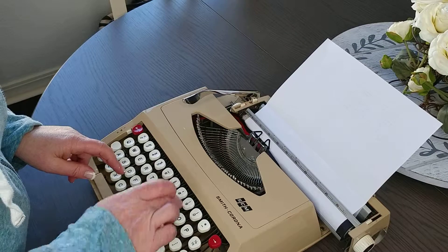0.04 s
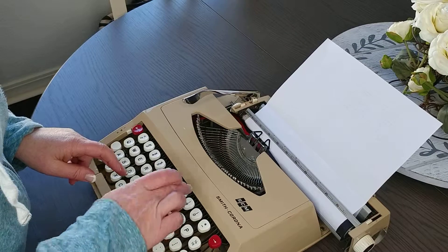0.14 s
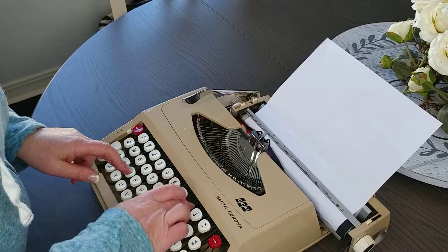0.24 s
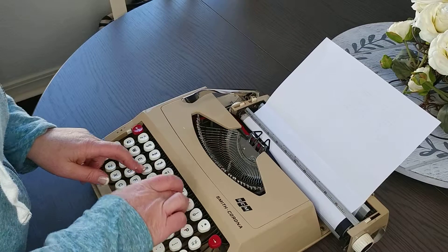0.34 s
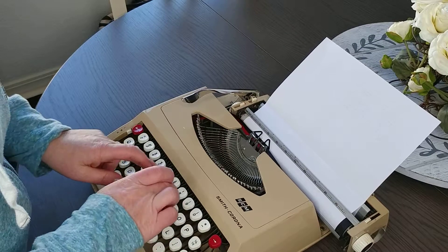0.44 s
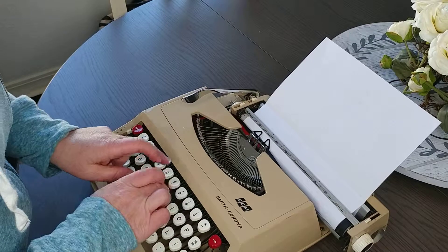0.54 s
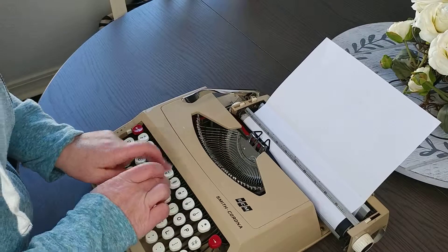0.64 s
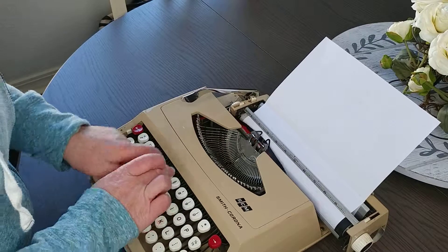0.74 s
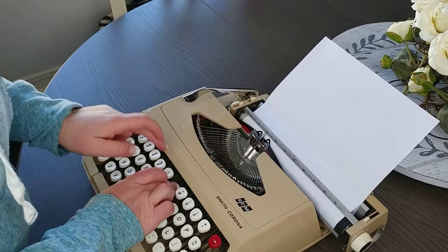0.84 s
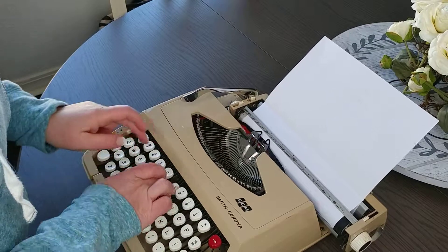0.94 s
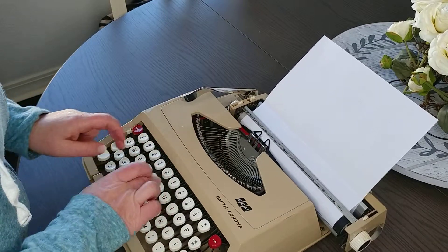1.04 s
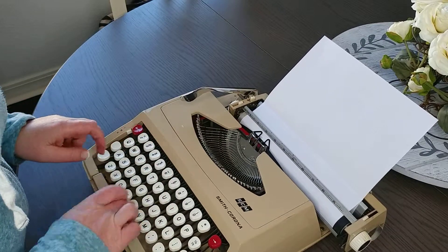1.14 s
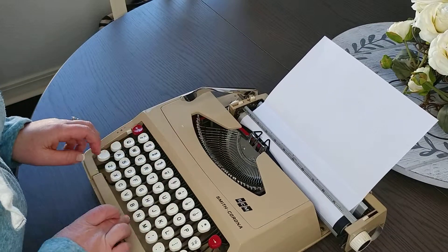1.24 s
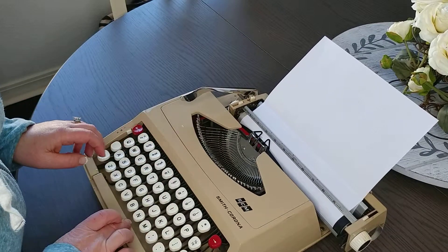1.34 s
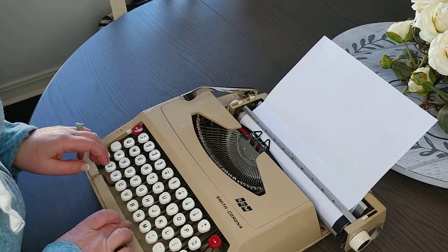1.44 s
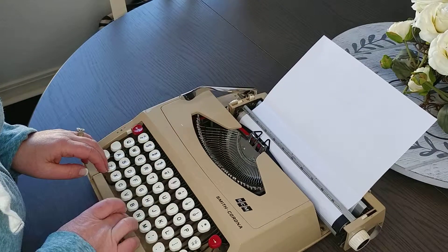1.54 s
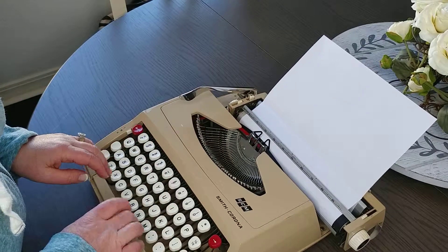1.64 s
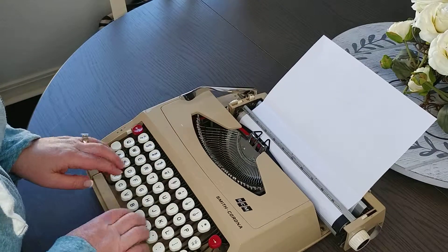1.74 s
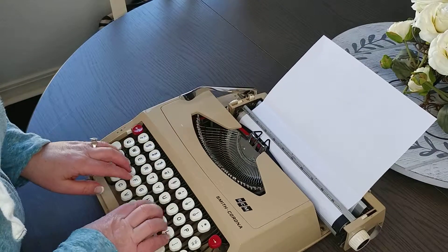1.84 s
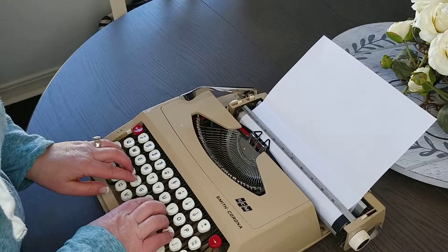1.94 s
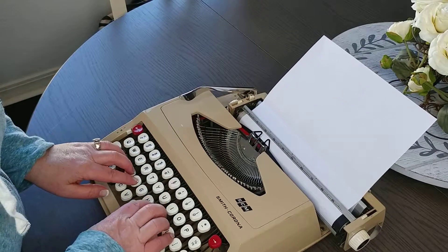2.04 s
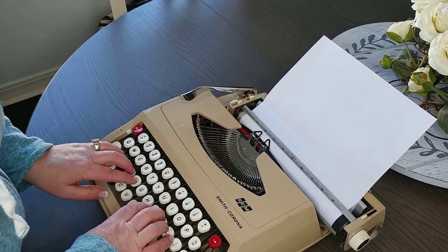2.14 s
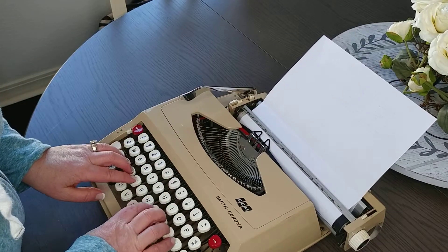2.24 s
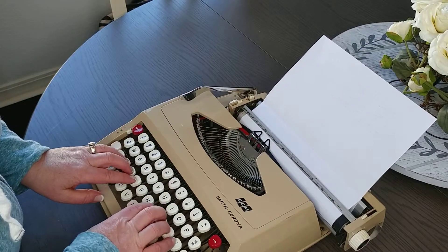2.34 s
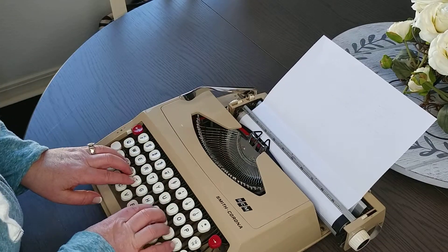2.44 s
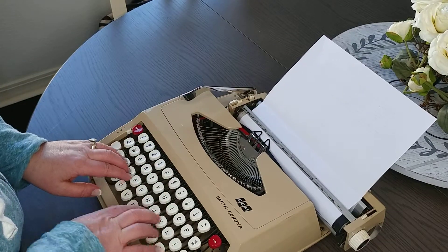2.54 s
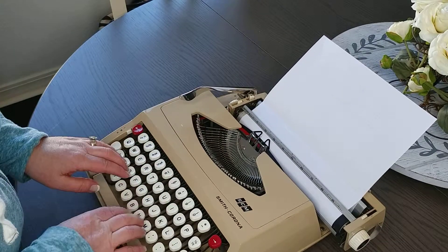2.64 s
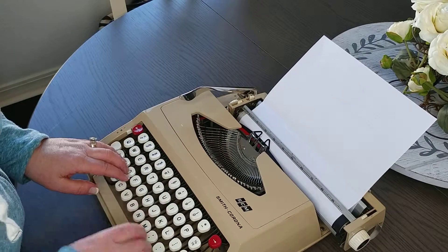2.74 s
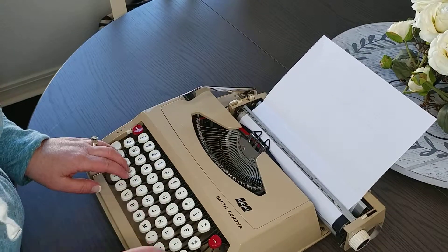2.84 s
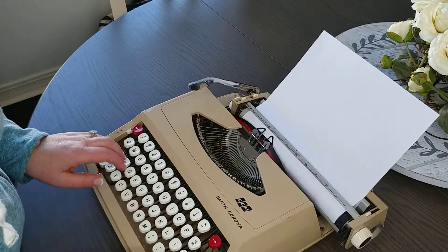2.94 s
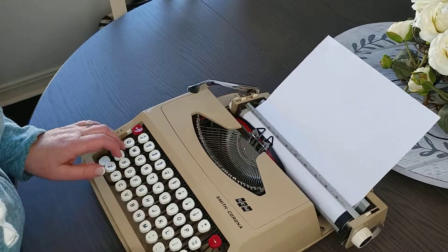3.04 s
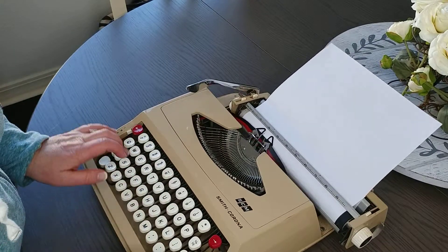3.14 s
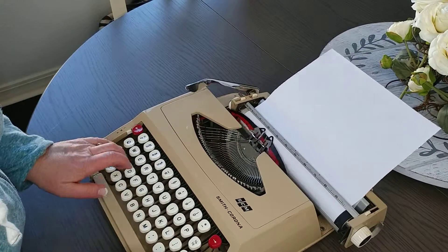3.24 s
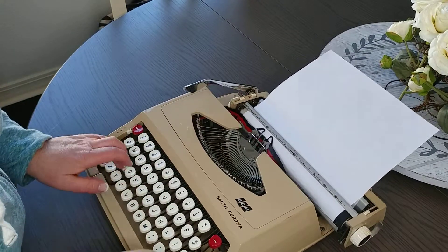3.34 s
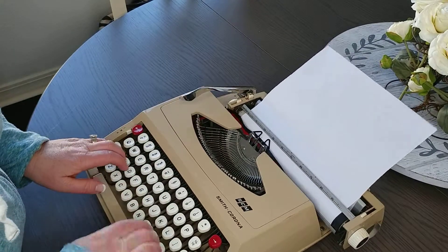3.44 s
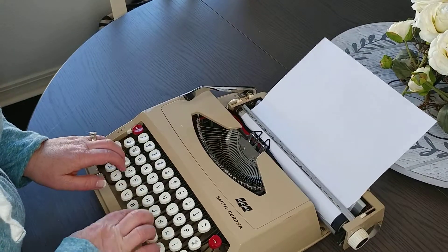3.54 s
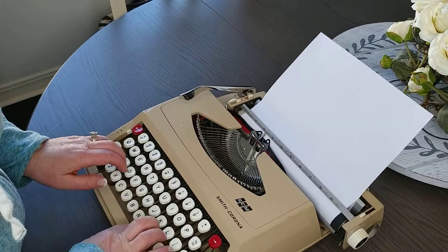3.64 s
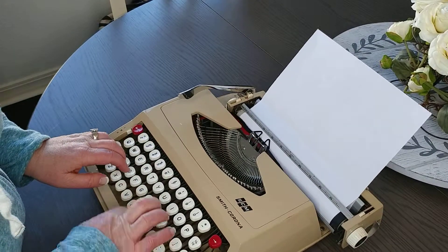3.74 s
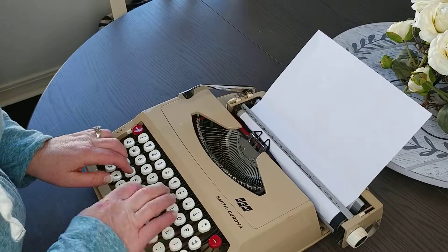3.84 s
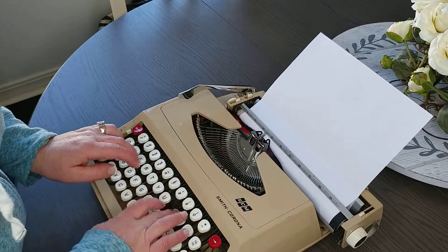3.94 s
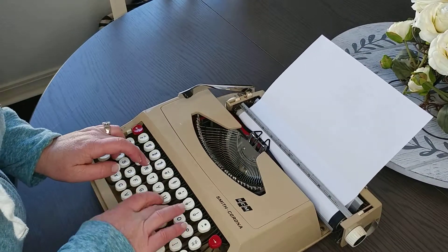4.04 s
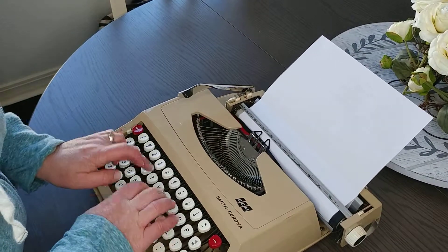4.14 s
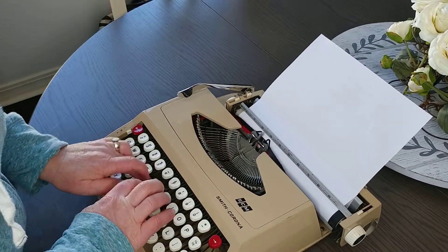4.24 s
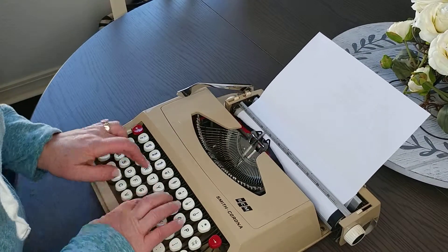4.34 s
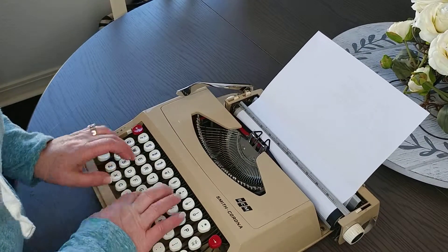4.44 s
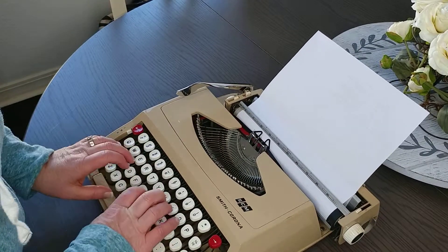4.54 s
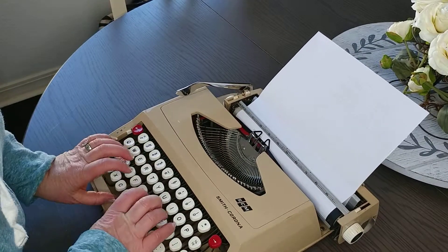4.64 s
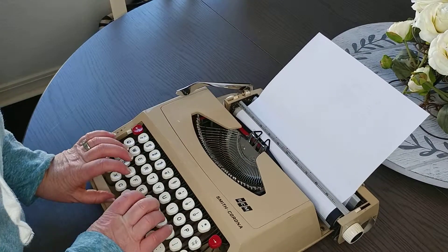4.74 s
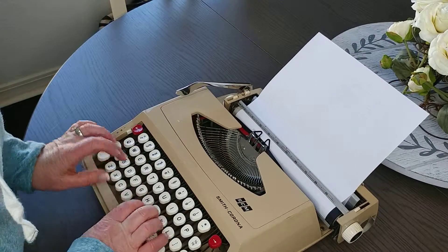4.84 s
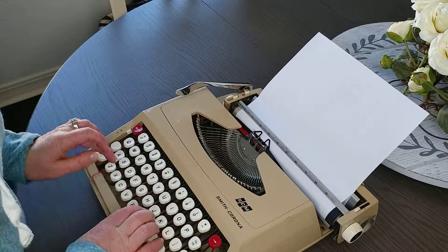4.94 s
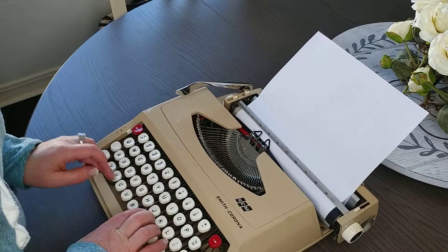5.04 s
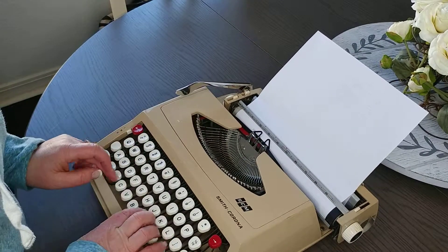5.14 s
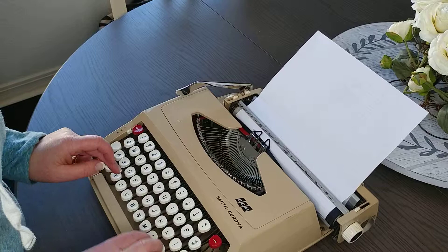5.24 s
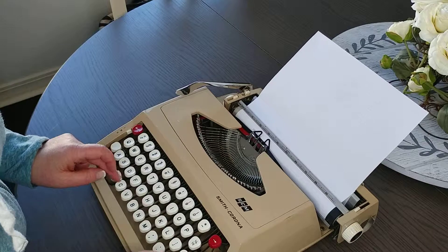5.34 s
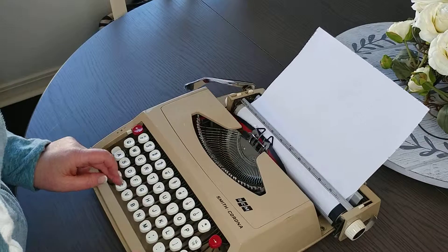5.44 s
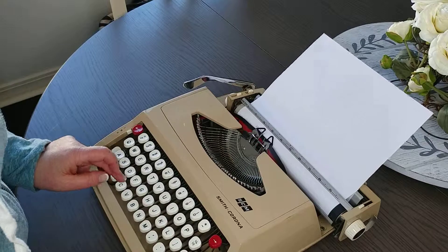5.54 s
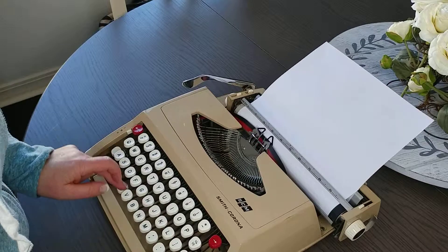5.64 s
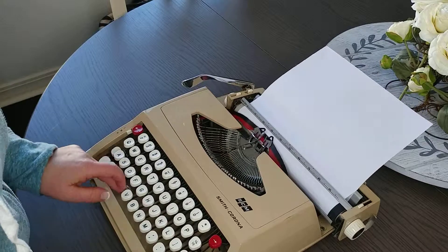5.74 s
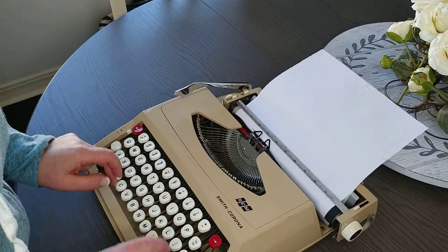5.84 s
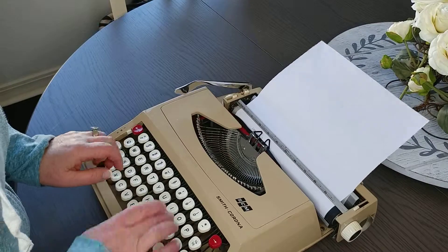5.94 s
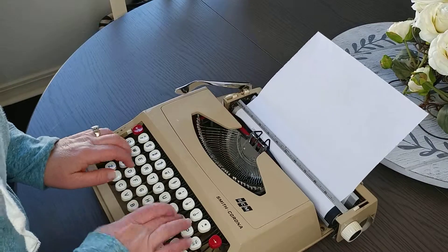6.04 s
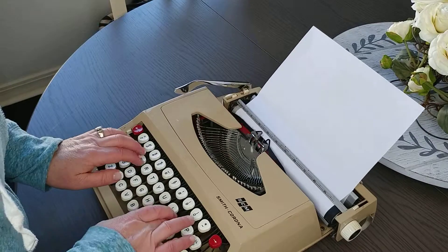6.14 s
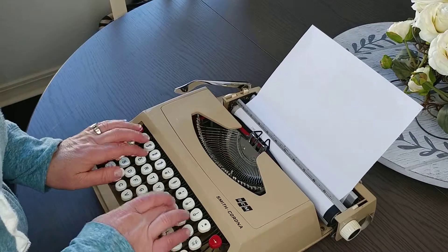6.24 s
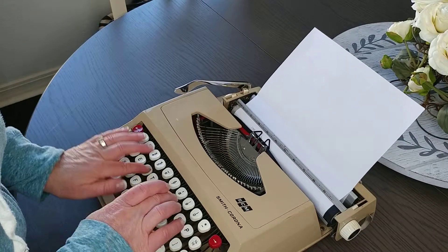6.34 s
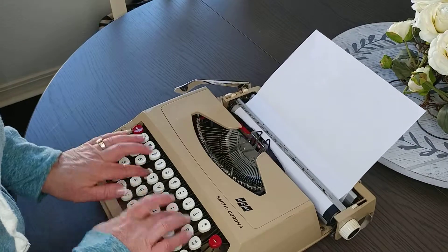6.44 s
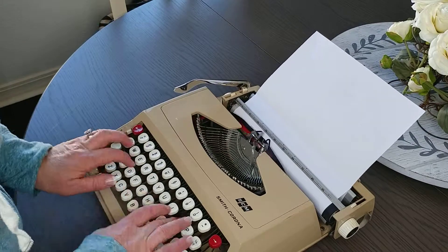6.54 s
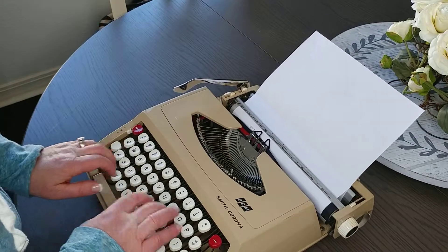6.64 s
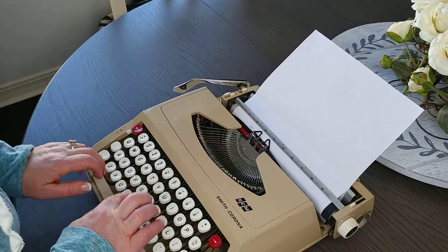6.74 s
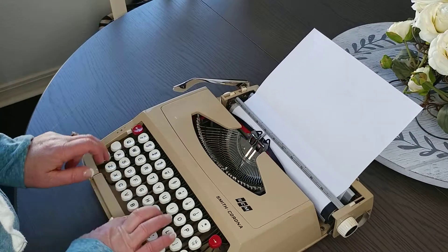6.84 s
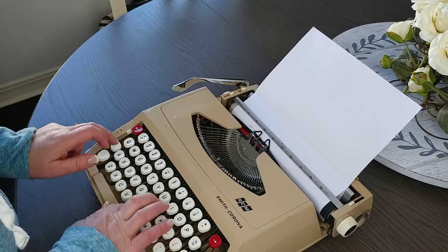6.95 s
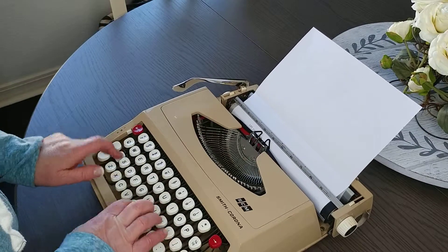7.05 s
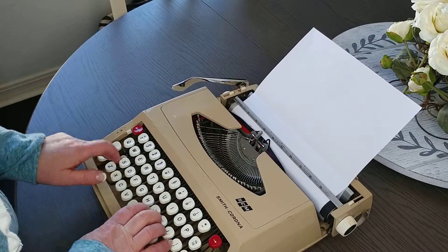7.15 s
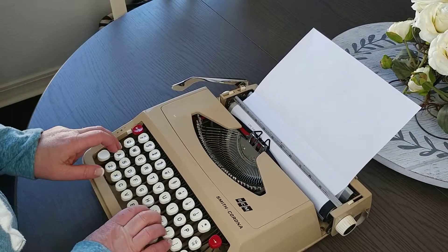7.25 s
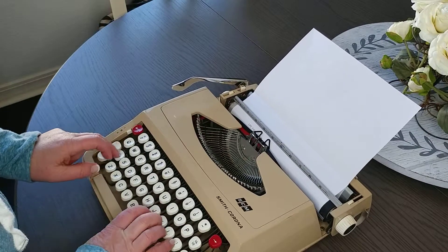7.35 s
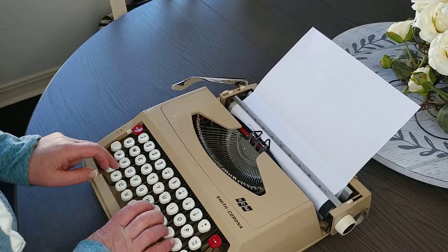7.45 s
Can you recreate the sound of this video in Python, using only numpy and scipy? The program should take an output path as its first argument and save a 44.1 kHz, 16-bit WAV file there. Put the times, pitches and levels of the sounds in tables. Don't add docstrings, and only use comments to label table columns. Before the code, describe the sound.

A portable manual typewriter typed in short runs and pauses, crisp metallic clacks over small rattling clicks, in a small hard quiet room.

```python
import sys
import numpy as np
from scipy import signal
from scipy.fft import rfft, irfft, next_fast_len
from scipy.io import wavfile
from scipy.ndimage import uniform_filter1d

SR = 44100
rng = np.random.default_rng(int(sys.argv[2]) if len(sys.argv) > 2 else 0)


def to_linear_factor(level_db):
    exponent = np.asarray(level_db, float) / 20
    return 10 ** exponent


def int16_out(signal):
    q = np.round(np.clip(np.atleast_2d(signal).T, -1, 1) * 32767)
    wavfile.write(sys.argv[1], SR, q.astype(np.int16))


N = 331191

# [t/s, peak level/dB, treble level/dB, left minus right/dB, shudder level/dB,
# swing rattle level/dB]
PLATEN_SLAPS = [(0.321, -3, -14, 0, -25.5, -34), (0.7623, -4.5, -15, 1.5, -24, -37),
                (0.9248, -3, -17, 1, -24.5, -31), (3.284, -5.5, -13, 0.5, -25, -31.5),
                (3.704, -4.5, -17.5, 0.0, -27.5, -29.5), (4.0151, -3, -16.5, 1, -26.5, -30),
                (4.2793, -4, -17.5, 0.5, -23, -34), (4.4095, -3.5, -16, 2, -27, -30.5),
                (5.7418, -3.5, -13.5, 1.5, -22.5, -30.5), (6.1396, -2.5, -17, -0.5, -25, -28),
                (6.4593, -3.5, -15, 1.5, -32.5, -31.5), (6.5529, -1.5, -17, -1, -26.5, -28),
                (6.8879, -2.5, -14, 1.5, -26.5, -31.5), (7.1634, -2.5, -14.5, 0.0, -23.5, -30.5)]
# [t/s, peak level/dB, bass level/dB, treble level/dB,
# rattle length/ms, rattle level/dB]
LINKAGE_CLICKS = [(0.0004, -19, -22.5, -14, 15, -9.5), (0.018, -19.5, -20.5, -11, 16, -12.5),
                  (0.0494, -19.5, -18.5, -13.5, 10, -10.5), (0.2921, -28, -21.5, -19.5, 12.5, -13),
                  (0.3077, -8, -29.5, -16, 15, -12), (0.407, -13.5, -25, -12, 9.3, -11.5),
                  (0.4388, -34, -15, -15, 12.5, -10), (0.7335, -35.5, -16, -17.5, 10, -15.5),
                  (0.7501, -8, -30, -18.5, 14, -11.5), (0.853, -16.5, -22, -17.5, 9.6, -8.5),
                  (0.8694, -17.5, -21, -11, 16, -11), (0.8954, -25.5, -12.5, -9, 12.5, -11),
                  (0.9118, -14.5, -31, -16.5, 15, -12), (1.048, -19.5, -28, -11, 12.5, -12),
                  (1.0795, -36, -10, -14.5, 14, -11), (1.486, -24.5, -16.5, -10.5, 12.5, -11.5),
                  (1.564, -27, -28, -12, 11, -15), (1.5763, -23.5, -19, -7, 12.5, -12),
                  (1.91, -68.5, -6, -9, 12.5, -9), (2.9781, -17, -23, -11.5, 12.5, -11.5),
                  (3.0196, -17.5, -21, -12.5, 16, -11.5), (3.06, -24, -11, -20.5, 12.5, -11),
                  (3.242, -38, -11, -4.5, 12.5, -11), (3.3494, -27.5, -36, -15.5, 12.5, -10),
                  (3.4115, -21, -18, -12, 12.5, -11.5), (3.4395, -28.5, -2.5, -4.5, 12, -11.5),
                  (3.4756, -11.5, -23.5, -12, 12.5, -11.5), (3.5356, -15.5, -32, -11.5, 9.6, -10.5),
                  (3.6614, -33.5, -15, -6.5, 12.5, -11.5), (3.7936, -19.5, -17.5, -10.5, 12.5, -11),
                  (3.8295, -35, -22, -12.5, 12.5, -12.5), (3.9805, -25.5, -19, -4.5, 12.5, -15.5),
                  (4.117, -19, -25, -11.5, 15, -12), (4.1496, -30.5, -12, -16, 14, -10.5),
                  (4.2434, -38, -14.5, -1.5, 10, -12), (4.3652, -14, -19, -10, 14, -11),
                  (4.5008, -18.5, -27, -11, 14, -11.5), (4.5501, -35, -12.5, -15.5, 11, -10),
                  (4.6763, -53, -15.5, -15, 12.5, -13), (4.7002, -34, -32.5, -10, 12.5, -13),
                  (4.7196, -20, -20.5, -9.5, 11, -13), (4.8421, -29.5, -33.5, -12, 12.5, -8.5),
                  (4.8511, -25.5, -13, -6.5, 10, -11), (5.4259, -28.5, -23, -11.5, 10, -13.5),
                  (5.4345, -33.5, -8, -17, 12.5, -11), (5.5046, -15.5, -18.5, -12, 15, -12.5),
                  (5.5294, -20, -10.5, -17, 12.5, -10.5), (5.7027, -41.5, -18, 2, 11, -12.5),
                  (5.8714, -21.5, -19, -15.5, 14, -10), (5.891, -20.5, -15, -12.5, 12.5, -10),
                  (5.9276, -13.5, -19, -12.5, 12.5, -9.5), (5.987, -17, -30, -12, 12.5, -13),
                  (6.1065, -33.5, -12, -2.5, 12.5, -13.5), (6.2502, -21, -19, -10, 15, -10),
                  (6.2902, -25.5, -22, -8.5, 12.5, -11.5), (6.4208, -37.5, -11, -8, 11, -12.5),
                  (6.5204, -23.5, -17, -5.5, 12.5, -14.5), (6.6549, -19.5, -20, -12, 15, -10),
                  (6.6986, -30.5, -11, -8, 12.5, -12), (6.8536, -34.5, -15, -2.5, 11, -15),
                  (6.979, -20.5, -17, -12, 12.5, -12.5), (7.0294, -34.5, -12, -16, 12.5, -11),
                  (7.122, -28, -16, -6, 15, -11.5), (7.2589, -18.5, -19.5, -26.5, 12.5, -12),
                  (7.3097, -29.5, -11, -12, 14, -11.5), (7.451, -24.5, -32, -17, 11, -11)]
# [f/Hz, level/dB per Hz]
CONTACT_COLOUR = [(100, -36.5), (300, -24.5), (600, -14), (1200, -1), (1600, 2), (2000, -1.5), (3500, 1.5),
                  (6000, 0.5), (7000, 1), (9200, -4.5), (10600, -17.5), (12000, -15), (15000, -17),
                  (17000, -23)]
# [f/Hz, level/dB, t60/s]
FRAME_MODES = [(743.6, -21.5, 0.082), (1268, -10, 0.092), (1825, -19.5, 0.11), (1993, -11, 0.096),
               (2230, -20, 0.065), (2590, -18, 0.06), (2800, -12.5, .08), (3454, -7, 0.08),
               (3960, -17.5, .05), (5870, 0, 0.033), (9340, -9.5, 0.055)]
# [t/s, rocking level/dB, sway level/dB, panel mode level/dB,
# wood knock level/dB]
TABLE_SHAKING = [(0.0, -44, -54, -41, -51), (0.04, -44, -45, -44, -42), (0.08, -44.5, -59, -61, -48),
                 (0.25, -61, -74, -78, -73.5), (0.33, -45, -49, -47, -45.5), (0.42, -44, -48, -47.5, -48.5),
                 (0.5, -47, -61, -72, -56), (0.58, -59, -67, -65, -69), (0.69, -66.5, -73, -71, -72),
                 (0.77, -45, -55, -52, -49.5), (0.86, -45, -49, -55, -48), (0.94, -40, -45, -44.5, -44),
                 (0.98, -44, -50, -44, -49.5), (1.11, -49.5, -53, -67, -52), (1.21, -68, -69.5, -68, -69.5),
                 (1.44, -70, -69, -81, -70), (1.51, -47, -48, -58, -49), (1.55, -51, -60, -60, -64),
                 (1.59, -46, -48, -57, -45.5), (1.65, -51.5, -65, -61, -56), (1.78, -71, -72, -71, -68.5),
                 (2.72, -69, -70, -73, -69), (2.93, -70, -71, -70, -70.5), (3.01, -51, -51, -48, -43.5),
                 (3.07, -34.5, -47, -43.5, -46.5), (3.16, -50.5, -62, -51, -54.5),
                 (3.24, -55, -61, -80, -61), (3.3, -50, -52, -62, -43.5), (3.39, -49, -61, -59, -60),
                 (3.43, -51, -51, -62, -47.5), (3.53, -38, -47, -45, -45.5), (3.64, -56, -60, -59, -57.5),
                 (3.74, -48, -50, -56, -46.5), (3.85, -46, -53, -60, -49), (3.95, -61, -67, -64, -66),
                 (4.02, -53, -43, -43.5, -47), (4.16, -47, -58, -62.5, -51), (4.22, -62, -65, -69, -65),
                 (4.29, -49, -52, -51, -45), (4.45, -41.5, -49, -45.5, -49.5), (4.54, -51, -52, -55, -49.5),
                 (4.58, -50, -60, -79, -55.5), (4.64, -60, -69, -72, -68), (4.75, -48, -51, -56, -49.5),
                 (4.81, -53, -60, -65, -60.5), (4.87, -51.5, -48, -52.5, -51), (4.94, -55, -63, -62, -57),
                 (5.06, -70, -72, -80, -74.5), (5.4, -73.5, -69.5, -69.5, -68.5),
                 (5.54, -36.5, -50, -46.5, -41.5), (5.58, -35, -52, -41.5, -52), (5.69, -55, -64, -66, -63),
                 (5.75, -50, -50, -44, -44.5), (5.85, -54, -60, -58, -57), (5.94, -37.5, -49, -50, -43.5),
                 (6.11, -49, -57, -55, -57), (6.15, -45, -45.5, -45, -45), (6.42, -57, -63, -63.5, -60),
                 (6.44, -54, -63, -63, -51.5), (6.57, -44, -46, -32, -45), (6.67, -44.5, -53, -44, -49.5),
                 (6.82, -62, -66, -66, -69), (6.9, -43, -47, -49, -48), (7.03, -46, -53, -51, -50.5),
                 (7.09, -57, -66, -57, -62), (7.17, -41, -48, -62, -48), (7.26, -50, -53, -56, -54),
                 (7.32, -45, -50, -59, -45.5), (7.38, -66, -72, -60, -63), (7.47, -58, -45, -61, -53),
                 (7.51, -47.5, -55, -50.5, -61)]
# [low f/Hz, high f/Hz, steadiness/0-1]
TABLE_RESONANCES = [
    (24, 50, 0.4),
    (52.6, 100, .3),
    (112.8, 124, 0.6),
    (132, 550, .1),
]
# [f/Hz, t60/s, level/dB against the direct sound, unlikeness at the ports/0-1]
ROOM_TAIL = [(295, 0.17, 1, 0.6), (755, 0.36, 4.5, .9), (2050, 0.3, 3.5, 0.97), (4655, 0.25, 3, 0.86),
             (8700, 0.2, 4.5, 1.07), (13300, 0.15, -7.5, .9)]
# [t/ms, level/dB]
FIRST_REFLECTIONS = [(3.5, -6), (8.5, -2.5), (11.5, 2.5), (14, -7.5), (28, -11)]
# [f/Hz, level/dB per Hz]
AIR_COLOUR = [(12, -37), (20, -7.5), (65, 3), (93, -9), (198, -6), (270, -20), (357, -11), (558, -16.5),
              (607, -19), (1290, -29.5), (1660, -31), (1910, -34.5), (16000, -39.5)]
# [f/Hz, level/dB rms]
FRIDGE_HUM = [(59.2, -76.5), (118.4, -75), (156.1, -72.5), (193.8, -75.5), (301.5, -76), (355.3, -76),
              (414.5, -77), (532.9, -85.5), (592.2, -84.5)]

PORTS = np.array([[1], [-1]])


def typebars():
    contact, frame = np.zeros((2, 2, N))
    t = np.arange(int(0.12 * SR)) / SR
    to_impact = np.arange(int(0.03 * SR))[::-1] / SR
    for s, db, treble_db, pan_db, shudder_db, swing_db in PLATEN_SLAPS:
        sides = to_linear_factor(PORTS * pan_db / 2)
        decay = np.exp(-t / 0.034) + to_linear_factor(16.5) * np.exp(-t / 0.002)
        blow = rattle(to_linear_factor(shudder_db) * decay, grain_db=3.0)
        add(blow, 0, to_linear_factor(14.5) * tick(spread_ms=1.193, scatter_ms=0.4004))
        add(contact, s, sides * to_linear_factor(db) * tint(blow, 0, treble_db + 15))
        swing = to_linear_factor(swing_db) * rattle(np.exp(-to_impact / 0.011), grain_db=1.5)
        add(contact, s - len(to_impact) / SR, sides * swing)
        ringing = ring(FRAME_MODES, 0.25, scatter_db=4.0, detune=0.0074)
        add(frame, s, sides * to_linear_factor(db - 15.5) * ringing)
    return contact, frame


def linkage():
    contact, frame = np.zeros((2, 2, N))
    t = np.arange(int(0.15 * SR)) / SR
    sides = to_linear_factor(PORTS * 0.7)
    for s, db, bass_db, treble_db, length_ms, rattle_db in LINKAGE_CLICKS:
        chatter = rattle(to_linear_factor(rattle_db) * np.exp(-1000 * t / length_ms), grain_db=1.65)
        add(chatter, 0, to_linear_factor(4) * tick(spread_ms=0.81, scatter_ms=0.55))
        add(contact, s, sides * to_linear_factor(db) * tint(chatter, bass_db + 21.5, treble_db + 12.5))
        ringing = ring(FRAME_MODES, 0.25, scatter_db=6.5, detune=0.023)
        add(frame, s, sides * to_linear_factor(db - 18) * ringing)
    return contact, frame


def tick(spread_ms, scatter_ms):
    size = 512
    bins = size // 2 + 1
    wander = 3 * np.abs(uniform_filter1d(rng.standard_normal(bins), size=9))
    delay_ms = spread_ms * np.exp(-np.arange(bins) / 39.8) + scatter_ms * wander
    delay = delay_ms * SR / 1000 + 4
    return irfft(np.exp(-2j * np.pi * np.cumsum(delay) / size))


def rattle(envelope, grain_db):
    size = to_linear_factor(grain_db * rng.exponential(size=len(envelope)))
    size = size / np.sqrt(np.mean(size ** 2))
    return envelope * rng.standard_normal(len(envelope)) * size


def tint(burst, bass_db, treble_db):
    bass = to_linear_factor(bass_db) * band(burst, 87, 1300)
    treble = to_linear_factor(treble_db) * band(burst, 6510, 17000)
    return bass + band(burst, 1300, 6260) + treble


def ring(modes, length_s, scatter_db, detune):
    hz, db, t60 = np.transpose(modes)[:, :, None]
    t = np.arange(int(length_s * SR)) / SR
    pitch_chance, level_chance = rng.standard_normal((2, len(modes), 1))
    swing = np.sin(2 * np.pi * hz * (1 + detune * pitch_chance) * t)
    decay = np.exp(-np.log(1000) * t / t60)
    return (to_linear_factor(db + scatter_db * level_chance) * swing * decay).sum(axis=0)


def table():
    s, *levels = np.transpose(TABLE_SHAKING)
    t = np.arange(N) / SR
    out = 0
    for (lo_hz, hi_hz, steady), db in zip(TABLE_RESONANCES, levels):
        noise = rng.standard_normal((2, N))
        mid, side = band(band(noise, lo_hz, hi_hz), lo_hz, hi_hz)
        envelope = np.abs(signal.hilbert(mid, next_fast_len(N))[:N])
        mid = mid / envelope ** steady
        both = mid / mid.std() + to_linear_factor(-14.5) * PORTS * side / side.std()
        out = out + to_linear_factor(np.interp(t, s, db) + PORTS * 0.45) * both
    return out


def room(x):
    t = np.arange(int(0.45 * SR)) / SR
    first = sum(to_linear_factor(db) * np.exp(-((1000 * t - ms) / 1.33) ** 2) for ms, db in FIRST_REFLECTIONS)
    build = np.clip((t - 0.004) / 0.014, 0, 1)
    shared, apart = rng.standard_normal((2, len(t)))
    echo = 0
    for hz, t60, db, unlike in ROOM_TAIL:
        noise = band(shared + unlike * PORTS * apart, hz / 1.502, hz * 1.503)
        echo = echo + to_linear_factor(db) * noise * np.exp(-np.log(1000) * t / t60)
    response = echo * (to_linear_factor(-26.5) * first + to_linear_factor(-31.5) * build)
    port_lag_ms = 0.11
    response[0, 0] += 1
    response[1, int(round(port_lag_ms * SR / 1000))] += 1
    return signal.fftconvolve(x, response, axes=-1)[:, :N]


def house():
    mid, side = colour(rng.standard_normal((2, N)), AIR_COLOUR)
    side = signal.sosfilt(signal.butter(1, 900, "highpass", fs=SR, output="sos"), side)
    out = (mid + PORTS * side) * to_linear_factor(-65) / mid.std()
    t = np.arange(N) / SR
    for hz, db in FRIDGE_HUM:
        waver = np.interp(t, np.linspace(0, t[-1], num=30), rng.standard_normal(size=30))
        partial = np.sin(2 * np.pi * (hz * t + rng.random()))
        out = out + np.sqrt(2) * to_linear_factor(db + 1.3 * waver) * partial
    return out


def colour(x, points):
    hz, db = np.transpose(points)
    size = 4096
    bin_hz = np.arange(size // 2 + 1) * SR / size
    gain = to_linear_factor(np.interp(np.log(bin_hz + 1), np.log(hz), db))
    cepstrum = irfft(np.log(gain))
    cepstrum[1:size // 2] *= 2
    cepstrum[size // 2 + 1:] = 0
    response = irfft(np.exp(rfft(cepstrum)))
    return signal.oaconvolve(x, response[None], axes=-1)[..., :N]


def band(x, lo_hz, hi_hz):
    edges = [lo_hz, min(hi_hz, 0.45 * SR)]
    return signal.sosfilt(signal.butter(2, edges, "bandpass", fs=SR, output="sos"), x)


def add(out, s, sound):
    i = max(int(s * SR), 0)
    out[..., i:i + sound.shape[-1]] += sound[..., :N - i]


def scene():
    contact, frame = np.add(typebars(), linkage())
    machine = to_linear_factor(6.5) * colour(contact, CONTACT_COLOUR) + frame
    return room(machine) + table() + house()


def roll_off(x):
    return signal.sosfilt(signal.butter(12, 16450, fs=SR, output="sos"), x)


def record(dry):
    mix = 1.167 * np.tanh(dry / 1.05)
    return roll_off(mix)


dry = scene()
out = record(dry)
int16_out(out)
```